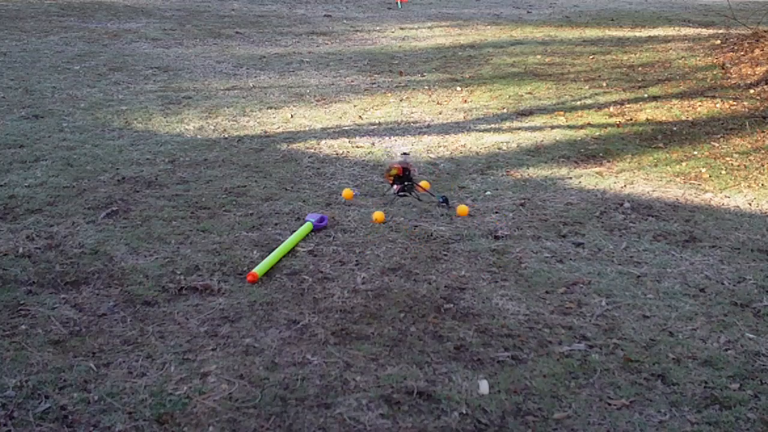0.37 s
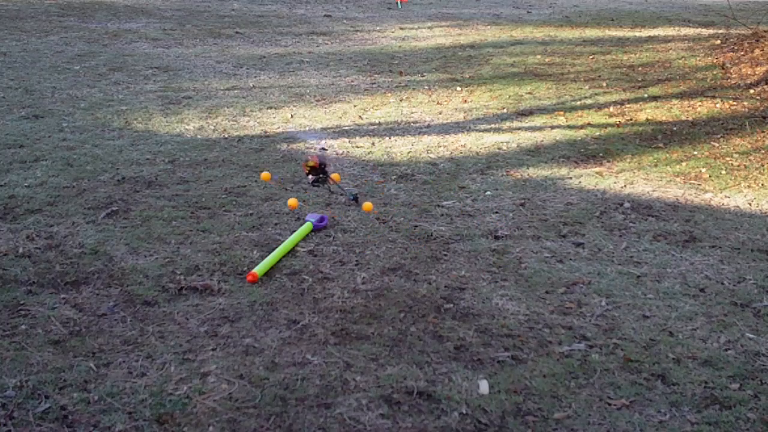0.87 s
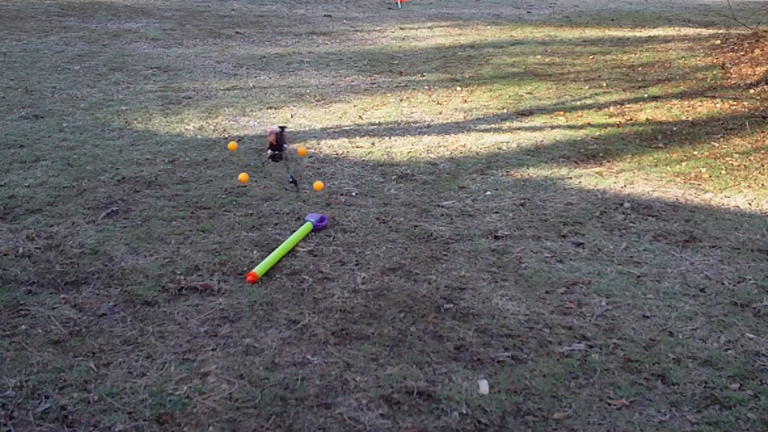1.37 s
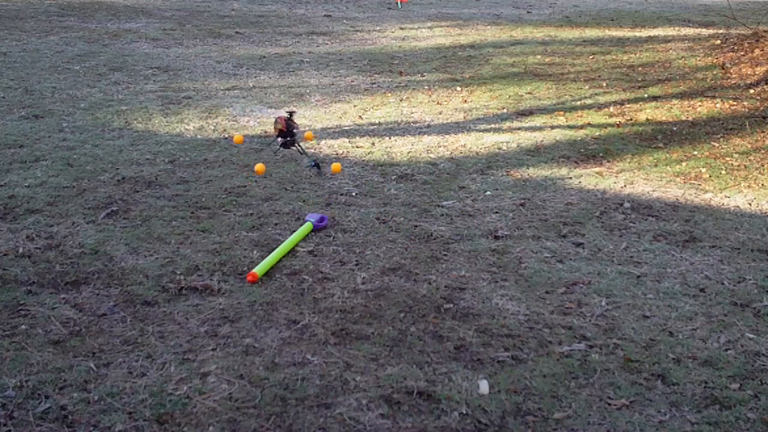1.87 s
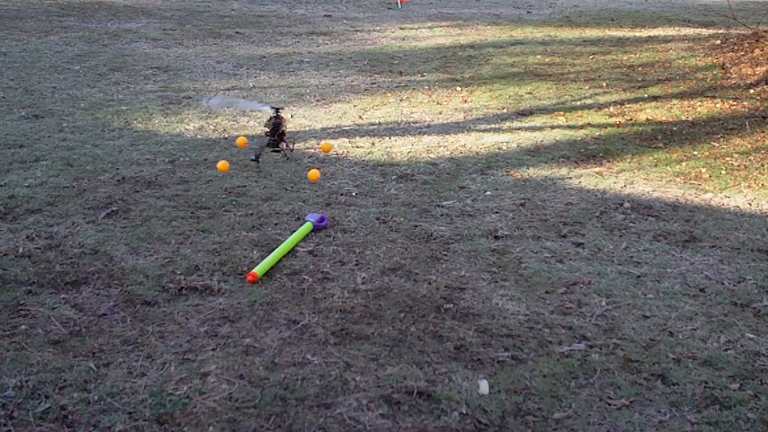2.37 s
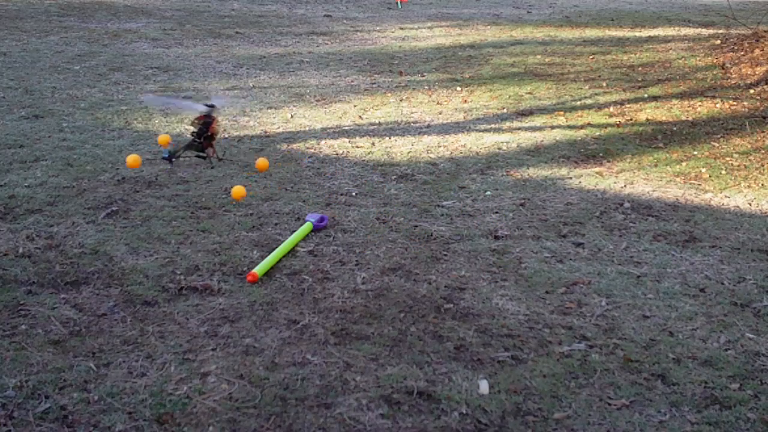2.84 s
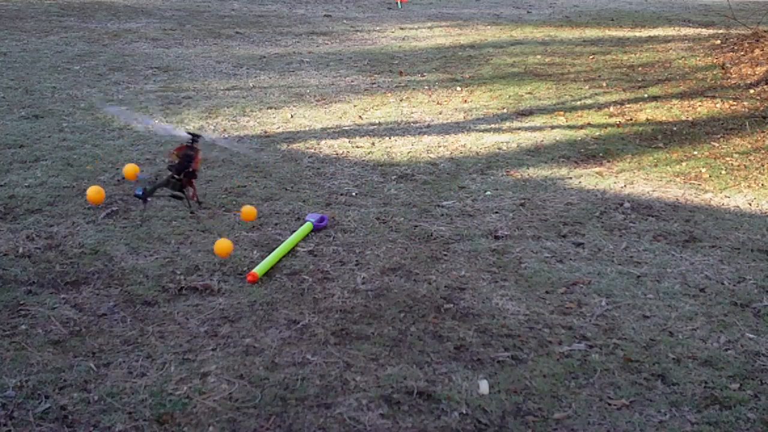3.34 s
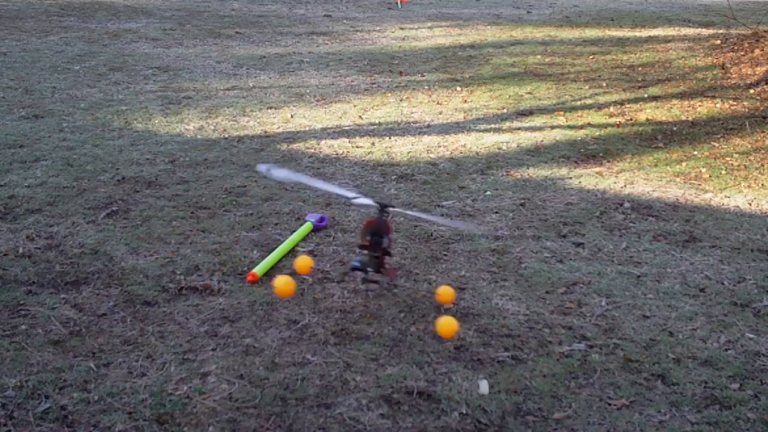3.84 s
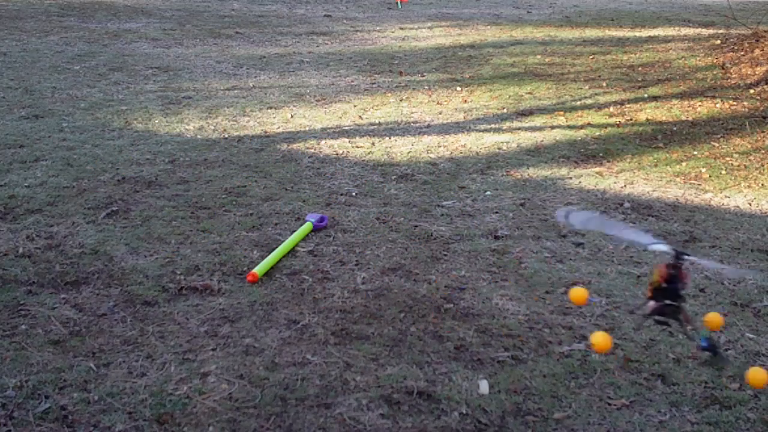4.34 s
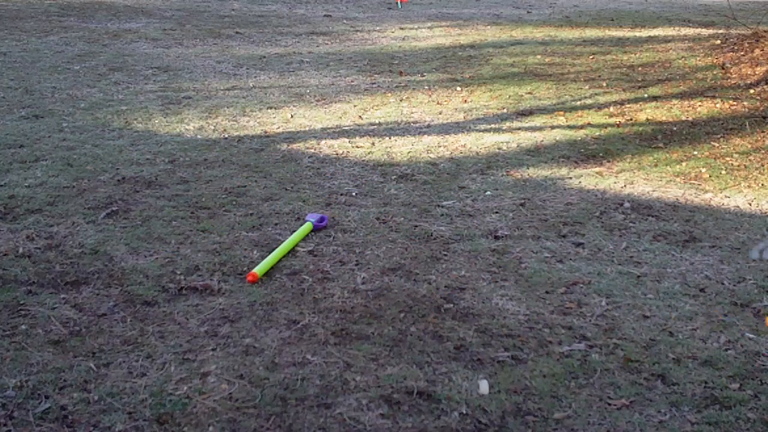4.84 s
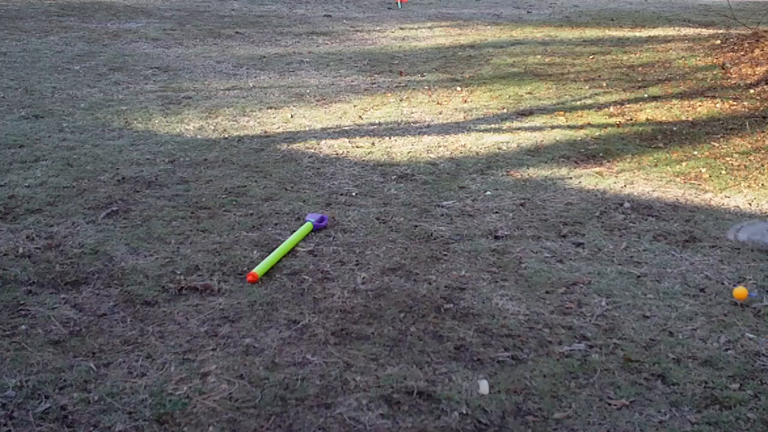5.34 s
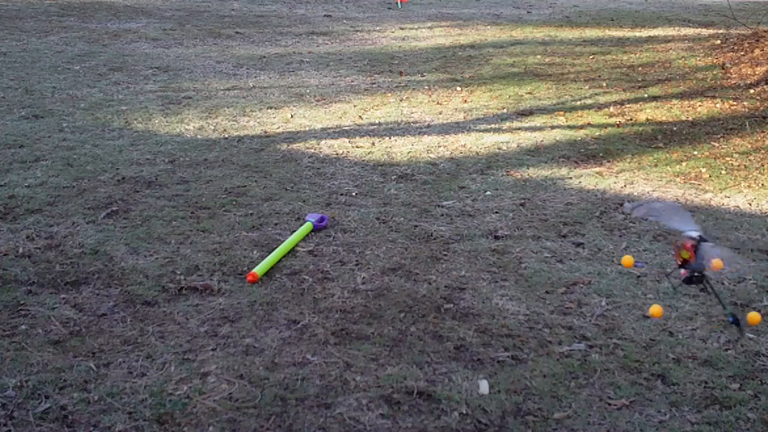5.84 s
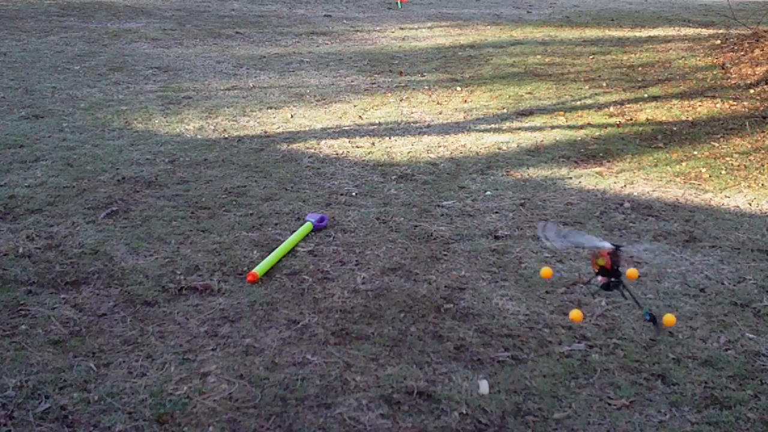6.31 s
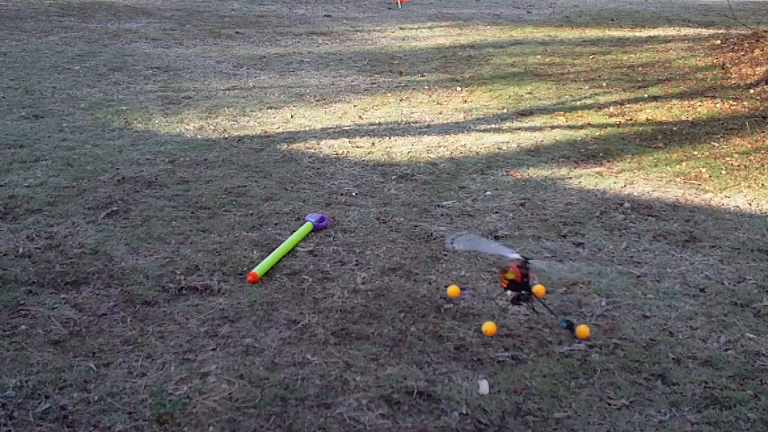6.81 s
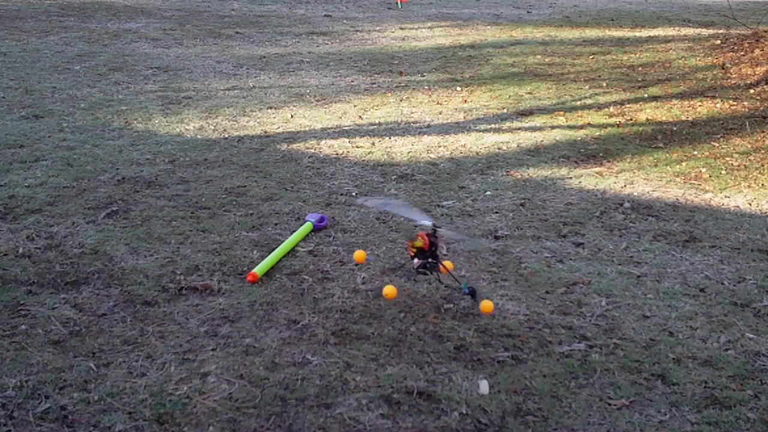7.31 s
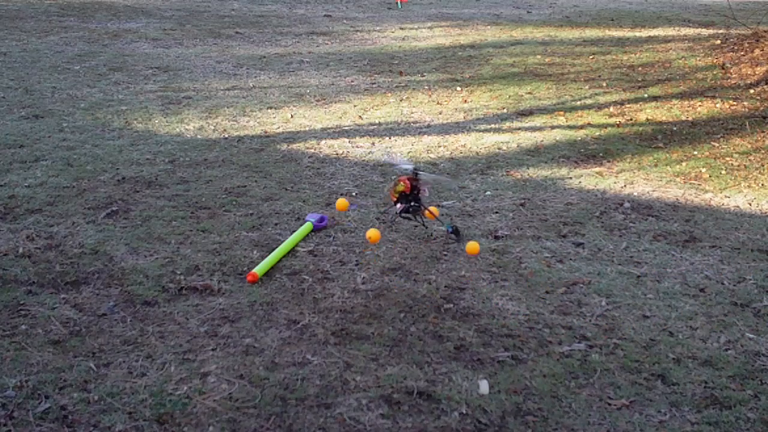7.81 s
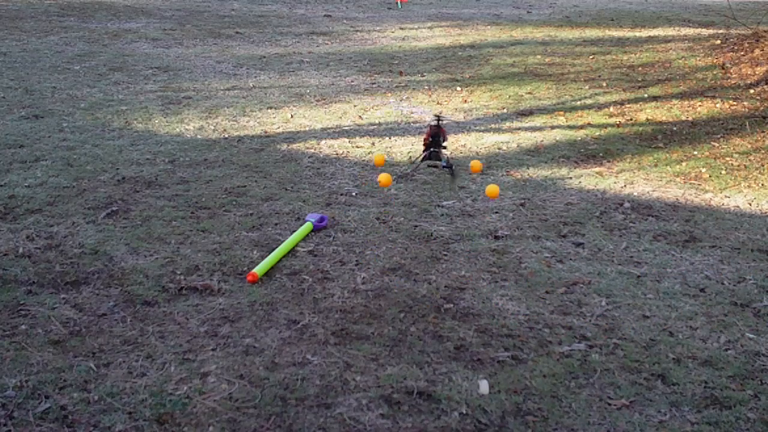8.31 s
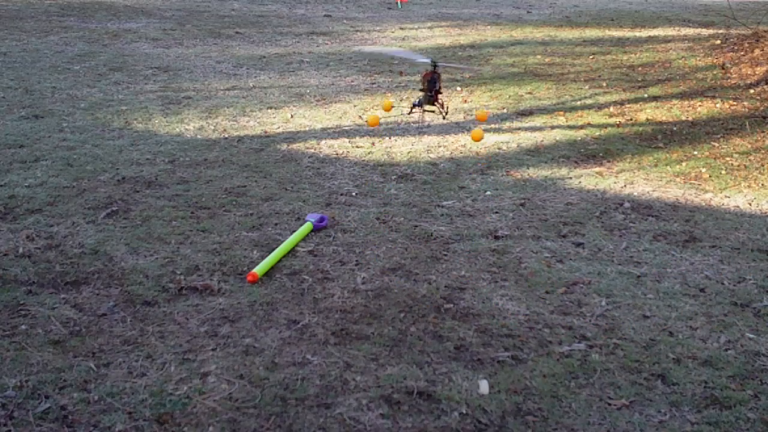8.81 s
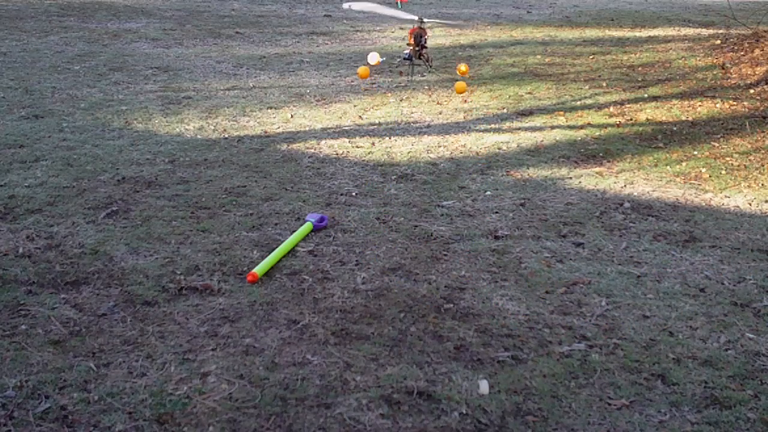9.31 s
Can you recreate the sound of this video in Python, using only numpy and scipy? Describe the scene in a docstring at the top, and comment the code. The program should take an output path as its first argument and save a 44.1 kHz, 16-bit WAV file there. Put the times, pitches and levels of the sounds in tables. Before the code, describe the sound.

A continuous electric motor whine, dense with buzzing overtones and gear rattle, comes from a little helicopter hovering low over a lawn. Airy rotor swish throbs about twenty-two times a second. Pitch climbs slightly in the first second, then wavers gently; brightness shifts as the craft turns. It swells midway, recedes a little and carries on without stopping. Distant road rumble lies beneath, uneven and thinning. Stationary open-air microphone, dry, no room echo.

```python
"""A whine on many multiples of a motor's speed: a small electric helicopter drifts to and fro low over a lawn.
The whine is a sum of sines with side tones, and the big gear repeats a pattern of knocks every rotor turn.
Filtered noise, throbbing with the rotor, gives the swish of the blades.
The grass returns a dull copy whose lag sweeps with the flight; far traffic, as filtered noise, rumbles below."""
import sys
import numpy as np
from scipy import signal
from scipy.fft import rfft, irfft, next_fast_len
from scipy.io import wavfile
from scipy.ndimage import uniform_filter1d, map_coordinates

SR = 44100
rng = np.random.default_rng(int(sys.argv[2]) if len(sys.argv) > 2 else 0)


def pcm_store(signal):
    """Save signal as 16-bit PCM."""
    levels = np.round(np.clip(np.atleast_2d(signal), -1, 1) * 32767)
    wavfile.write(sys.argv[1], SR, levels.astype(np.int16).T)


def convert_level_to_amplitude(level_db):
    """Map a level in decibels to its linear amplitude factor."""
    exponent = np.asarray(level_db, float) / 20
    return 10 ** exponent


N = 415422
STEP = 64   # samples between the values of a slow curve

# Motor speed, sagging and recovering with the load. Each row: time in seconds, speed in turns per second.
MOTOR_SPEED = [(0.0, 303.1), (0.52, 301.7), (0.62, 303.4), (0.76, 310.5), (0.88, 313.2), (1.0, 314.4),
               (1.12, 314.1), (1.3, 311.9), (1.75, 309.6), (1.97, 308.0), (2.38, 309.5), (2.62, 311.5),
               (3.0, 308.3), (3.45, 310.1), (3.72, 309.8), (4.25, 307.1), (4.5, 307.9), (4.72, 307.4),
               (5.05, 308.3), (5.25, 307.9), (5.75, 309.8), (6.0, 310.0), (6.35, 309.4), (6.55, 308.6),
               (6.64, 308.9), (6.78, 310.2), (7.25, 311.1), (7.85, 309.8), (8.17, 307.9), (8.55, 308.8),
               (8.9, 308.5), (9.15, 307.7), (9.42, 307.9)]
GEAR_RATIO = 14   # motor turns per rotor turn

# Strong whine lines. Each row: motor multiple, level in dB at the mean airframe level,
# share of the airframe level swing (dB per dB), share of the facing swing (dB per dB).
STRONG_LEVELS = [(3, -57.5, 0.16, 0.041), (5, -53, 0.21, -0.1), (10, -53, 0.49, -.1), (15, -56, 0.56, -.3),
                 (20, -55, 0.82, 0.45), (30, -48, 0.79, 0.43), (35, -62.5, 0.3, 0.34)]
# Side tones of the same lines, in the same order. Each row: motor multiple, first side tones in dB
# against the line, fall in dB per further side tone, looseness 0-1 (0: in step, one tick a rotor turn).
STRONG_SIDES = [(3, -13, 2.0, 1), (5, -13, 3.5, .7), (10, -7, 3.5, 1), (15, -5, 6.0, 1), (20, -7, 4.5, .6),
                (30, -2, 2.6, 1), (35, -1, 1.4, .15)]
# Weak whine lines. Each row: motor multiple, level in dB against the airframe level,
# first side tones in dB against the line, fall in dB per further side tone.
WEAK_LINES = [(2, -29, -19, 0.5), (6, -23.5, -13, 5), (8, -23, -23, 5), (11, -13.5, 5, 0),
              (12, -14.5, 0, 5), (13, -20, -5, -13), (14, -35, 6, -8), (16, -20.5, -5, 8),
              (17, -31, -3, -3), (31, -8, -4, -2.5), (32, -37, -5, 1.5)]
# Spread of the highest lines into side tones. Each row: time in seconds, divisor of the fall.
SCATTER = [(0, 4.1), (1.2, 3.1), (1.6, 1.1), (4.3, 1.1), (4.7, 4.1), (8.0, 4.1), (8.4, .8), (9.42, .8)]
# One whine line swells or sinks for a while.
# Each row: centre in seconds, motor multiple, length in seconds, change in dB.
SWELLS = [(0.44, 3, 0.42, -20), (0.1, 5, .4, -5), (0.59, 5, 0.34, -11), (0.2, 35, 0.73, 13.5),
          (1.13, 3, 0.62, 3), (0.51, 15, 0.97, -8), (0.5, 20, 0.85, -3), (0.39, 10, 0.49, -5),
          (1.05, 15, 0.35, 2.5), (1.15, 12, 0.6, -6), (1.6, 30, 0.27, 2.5), (2.05, 5, 0.28, -2),
          (3, 6, 1.6, 6), (3.8, 12, .5, -3), (3.6, 5, .15, -3), (1.2, 20, .6, -5), (1.85, 3, 0.27, -5),
          (1.74, 15, 0.25, 4), (1.95, 10, 0.43, -7), (2.7, 20, 0.74, 0), (2.28, 3, .5, 1.5),
          (2.4, 5, .15, -3), (3.2, 30, 1.6, 1), (2.95, 5, 0.23, 2), (3.5, 5, 0.22, -2.5),
          (2.85, 15, .9, -10), (3, 20, 0.43, 2), (3.8, 5, .25, 3.5), (4.0, 35, .5, 12), (4.4, 10, 0.5, 4),
          (5.1, 35, .4, -6), (4.9, 20, 0.76, 7), (4.85, 3, 0.16, 2), (4.5, 20, 0.28, 3),
          (4.5, 15, .15, 2.5), (4.2, 5, 0.16, -8), (4.95, 6, 0.57, -7), (5.1, 10, 0.23, 2),
          (5.202, 5, 0.34, -2.5), (5.4, 12, .5, 0), (5.7, 15, 1.8, 2.5), (5.95, 6, .3, -7),
          (6.5, 15, .2, -3), (7.8, 12, 0.26, 8), (7.0, 15, .3, -5), (5.7, 5, .3, 5), (6.7, 3, 0.43, 4),
          (6.7, 10, 0.63, -3), (7.197, 10, .4, 1.5), (7.687, 5, 0.34, 3.5), (7.7, 3, .5, 3.5),
          (8.8, 3, 0.62, 6), (8.2, 35, 2.4, 7), (8.3, 5, 0.78, -2), (8.4, 6, .5, 4.5), (9, 10, 0.36, -1),
          (8.8, 3, 0.26, 3.5), (8.8, 15, .3, -4), (8.5, 12, .3, 2), (9.2, 20, .5, -1), (9.3, 5, 0.53, -6.5)]
MEAN_AIRFRAME_DB = -44
WAVER_DB, WAVER_HZ = 1.25, 4.6   # spread and rate of the strong lines' unsteadiness

# Drive of the gear and blade noise. Each row: time in seconds, airframe level in dB,
# facing in dB (up when the open gear side points this way).
AIRFRAME = [(0.0, -44.5, -14), (0.2, -44.5, -16), (0.6, -47, -4), (0.95, -46.5, -4), (1.42, -48, 0.5),
            (1.91, -45.5, -7), (2.13, -47, 3), (2.5, -46, 6), (3.01, -44, 5), (3.38, -41.5, 5.5),
            (3.65, -40, 0.1), (3.95, -41, 4), (4.12, -40, 2.5), (4.35, -40.5, -1.5), (4.51, -40.5, -8),
            (4.75, -41.5, -4), (5.1, -42, -5.5), (5.6, -42.5, -5), (5.75, -44.5, 2), (6.4, -44.5, -1),
            (6.87, -45, 1.5), (7.03, -43, -2), (8.1, -44, -2.5), (8.37, -46, 0.5), (8.66, -44.5, 3),
            (9.18, -46, 9.5), (9.42, -46.5, 9)]
# Spectrum of the tooth knocks. Each row: frequency in Hz, relative density in dB.
TEETH_COLOUR = [(500, -33), (900, 2), (1050, -10), (1170, 5), (1350, -33), (2200, -2.5), (3100, -2.5),
                (4000, 5.5), (4500, -1), (6000, -6.5), (7500, -2), (9400, 3.5), (11000, -33), (13000, -54)]
# Spectrum of the blade noise. Each row: frequency in Hz, relative density in dB.
SWISH_COLOUR = [(300, -6.5), (700, -9.5), (1200, -9.5), (2000, -10), (3000, -4), (4400, -9), (6300, -4.5),
                (7600, -9), (9400, -8.5), (11000, -5), (11900, -12), (12400, -7.5), (13000, -22.5),
                (13900, -21.5), (14900, -39)]
# Throb of the treble swish. Each row: times per rotor turn, height of the cosine in dB.
THROB = [(1, 2), (2, 1.24), (4, -2), (8, 1.5)]
TREBLE_DB, TREBLE_PER_FACING = -4.5, 0.13   # wash treble: level in dB at facing 0, dB per dB of facing

# Lag of the ground echo, longer when the helicopter is near or high.
# Each row: time in seconds, lag in milliseconds.
ECHO_LAG = [(0.0, 1.0), (0.36, 1.01), (0.7, 0.73), (1.0, 0.6), (1.3, 0.61), (1.6, 0.68), (2.2, 0.95),
            (2.55, 1.26), (3.1, 1.84), (3.35, 1.95), (3.6, 2.25), (3.85, 2.3), (4.15, 2.2), (4.5, 1.94),
            (5.05, 1.51), (5.6, 1.08), (5.88, 0.85), (6.15, 0.77), (6.4, 0.64), (6.9, 0.61), (7.2, 0.74),
            (7.66, 1.08), (8.17, 1.51), (8.5, 1.62), (9.1, 1.9), (9.42, 1.9)]
# How well the lawn mirrors the small gearbox. Each row: frequency in Hz, gain in dB.
GRASS_GAIN = [(900, -2.5), (1550, -5), (1900, -5), (3100, -22), (3700, -9), (4600, -8), (6200, -9.5),
              (9300, -15)]
GRASS_CUT_HZ = 2130   # the wide rotor disc is mirrored mainly below this

# Spectrum of the road rumble. Each row: frequency in Hz, relative density in dB.
RUMBLE_COLOUR = [(15, -33), (30, -2.5), (60, -4), (90, 2.5), (150, -2.5), (240, 0), (330, -6.5),
                 (470, -14.5), (700, -28), (1500, -30.5), (3000, -44)]
# Surges of the rumble. Each row: centre in seconds, length in seconds,
# change of the deep part in dB, change of the upper part in dB.
SURGES = [(0.05, 0.49, -2, 4.5), (0.312, 0.1, 3.5, -6), (0.86, .5, -1.5, 2), (1.3, 0.48, 4.5, 0.5),
          (1.0, 0.16, 1, 1), (1.7, 0.16, 10.5, 1.5), (1.963, 0.24, 1, 4.5), (2.368, 0.35, 9, 1.5),
          (2.67, 0.24, 7, -1), (3.034, 0.38, 0.5, 3), (3.6, 0.43, -1.5, 1), (4.144, 0.38, -4.5, 6.5),
          (4.309, 0.41, 7.5, -3.5), (4.895, 0.75, -0.5, 3), (5.194, 0.22, 6, 3.5), (6.008, .5, 4.5, 3.5),
          (6.45, 0.33, 1, 3), (7.0, .3, 2, -0.5), (7.55, 0.16, 6, 4), (9.0, 0.5, -1, 2.5)]
# The traffic draws away: level in dB at the start, loss in dB per second.
DEEP_DB, DEEP_LOSS = -48.5, 0.56
UPPER_DB, UPPER_LOSS = -45, 1.27
HISS_DB, HISS_LOSS = -57.5, 0.5   # tyre noise above the rumble

NOTCH_HZ, NOTCH_WIDTH_HZ = 7860, 260


def whine(motor, airframe_db, facing_db):
    """Periodic forces: sines on motor multiples, modulated into side tones; mesh jitter blurs the high ones."""
    jitter_turns = (0.56 * drift(60) + 1.6 * drift(23)) / 1000
    mesh = motor + jitter_turns
    scatter = in_time(SCATTER)[0][::STEP]
    strong = strong_db(airframe_db, facing_db)
    lines = [(multiple, db, *sides) for (multiple, *sides), db in zip(STRONG_SIDES, strong)]
    lines += [(multiple, airframe_db + db, *sides) for multiple, db, *sides in WEAK_LINES]
    out = np.zeros(N)
    for multiple, db, first_db, fall_db, *looseness in lines:
        widened, tail_db = (scatter, 3.5) if multiple > 29 else (1, 0)
        rotor = motor[::STEP] / GEAR_RATIO
        sides = side_tones(rotor, first_db, fall_db / widened, tail_db, *looseness)
        line_db = db[::STEP] + swells_db(multiple)[:len(sides)]
        envelope = filled(sides * convert_level_to_amplitude(line_db) * np.sqrt(2))
        angle = (2 * np.pi * (round(multiple) * mesh % 1)).astype(np.float32)
        out += envelope.real * np.cos(angle) - envelope.imag * np.sin(angle)
    return out


def strong_db(airframe_db, facing_db):
    """Directivity and distance: each strong line follows both swings by its own shares, and wavers."""
    wavers = drifts(WAVER_HZ, count=len(STRONG_LEVELS))
    swing_db = airframe_db - MEAN_AIRFRAME_DB
    return [db + near * swing_db + faced * facing_db + filled(WAVER_DB * waver)
            for (_, db, near, faced), waver in zip(STRONG_LEVELS, wavers)]


def swells_db(multiple):
    """Superposed level changes: the bumps, in dB, of one whine line."""
    bumps = (db * bump(s, length) for s, k, length, db in SWELLS if round(k) == round(multiple))
    return sum(bumps, 0 * bump(0, 1))


def side_tones(rotor, first_db, fall_db, tail_db, looseness=1):
    """Modulation: run-out repeats each turn, giving side tones a rotor multiple apart that shift as the body turns."""
    away = np.r_[-11:0, 1:12][:, None]
    sway = drifts(4.0, count=2 * len(away))[:, :len(rotor)]
    tail_drive_db = tail_db * (away % 4 == 0)   # the tail gear turns four times per rotor turn
    strength = convert_level_to_amplitude(first_db - fall_db * (abs(away) - 1) + tail_drive_db + 3.0 * sway[::2])
    loose_turns = looseness * (rng.random(away.shape) - 0.5 + 0.2 * sway[1::2])
    turns = away * rotor + loose_turns
    envelope = 1 + np.sum(strength * np.exp(2j * np.pi * turns), axis=0)
    power = uniform_filter1d(abs(envelope) ** 2, size=180)   # mean over about a quarter second
    return envelope / np.sqrt(power)


def teeth(rotor, renew_s):
    """Periodic excitation: the knocks repeat each turn; the pattern heard changes slowly as the body turns."""
    steps = 2000   # pattern points per rotor turn
    patterns = rng.standard_normal((40, steps + 1))
    patterns[:, -1] = patterns[:, 0]   # closes the circle
    place = np.arange(N) / SR / max(renew_s, 0.3)
    blend = place % 1
    heard = map_coordinates(patterns, [place, rotor % 1 * steps], order=1)
    even = heard / np.sqrt(blend ** 2 + (1 - blend) ** 2)   # same power throughout the blend
    return coloured(even, TEETH_COLOUR)


def swish(rotor):
    """Turbulence noise of blades and tail rotor, amplitude-modulated by the rotor, most in the treble."""
    low, high = split(coloured(rng.standard_normal(N), SWISH_COLOUR), 8500)
    throb_db = per_turn(rotor, THROB)
    low_gain = convert_level_to_amplitude(0.4 * throb_db + 0.5 * drift(3.7))
    high_gain = convert_level_to_amplitude(throb_db + 0.5 * drift(13))
    return low * low_gain + high * high_gain


def per_turn(rotor, rows):
    """Fourier series: a pattern repeating every rotor turn, as a few cosines of chance phase."""
    return sum(size * np.cos(2 * np.pi * (round(times) * rotor + rng.random())) for times, size in rows)


def patchy(x, depth_db, rate_hz):
    """Uneven radiation of the turning body: overlapping bands swell and sink on their own."""
    size, count = next_fast_len(N), 8
    octaves = np.log2(np.fft.rfftfreq(size, 1 / SR) / 500 + 1e-9)
    place = np.clip(octaves * 1.6, 0, count - 1)   # 1.6 bands per octave from 500 Hz
    spectrum = rfft(x, size)
    out = np.zeros(N)
    for k, sway in enumerate(drifts(rate_hz, count=count)):
        band = irfft(spectrum * np.clip(1 - abs(place - k), 0, 1), size)[:N]
        out += band * filled(convert_level_to_amplitude(depth_db * sway))
    return out


def grass_echo(tones, wash, lag_ms):
    """Interference: a late, duller copy off the lawn combs the spectrum of the direct sound."""
    mirrored_tones = coloured(tones, GRASS_GAIN, even=False)
    mirrored_wash = convert_level_to_amplitude(-8.5) * split(wash, GRASS_CUT_HZ)[0]
    delayed_place = np.arange(N) - lag_ms * SR / 1000
    return np.interp(delayed_place, np.arange(N), mirrored_tones + mirrored_wash)


def traffic():
    """Broadband road noise in three bands, each fading at its own pace; surges make the lower two lumpy."""
    s = np.arange(N) / SR
    deep_surge_db = filled(sum(db * bump(at, length) for at, length, db, _ in SURGES))
    upper_surge_db = filled(sum(db * bump(at, length) for at, length, _, db in SURGES))
    deep_db = DEEP_DB - DEEP_LOSS * s + deep_surge_db + 0.75 * drift(5.4)
    upper_db = UPPER_DB - UPPER_LOSS * s + upper_surge_db + 1.36 * drift(5.7)
    hiss_db = HISS_DB - HISS_LOSS * s + 1.1 * drift(2.3)
    deep, rest = split(coloured(rng.standard_normal(N), RUMBLE_COLOUR), 112)
    upper, hiss = split(rest, 366)
    return convert_level_to_amplitude(deep_db) * rms_one(deep) + convert_level_to_amplitude(upper_db) * rms_one(upper) + convert_level_to_amplitude(hiss_db) * rms_one(hiss)


def rms_one(x):
    """Normalisation: scale to unit rms."""
    return x / np.sqrt(np.mean(x ** 2) + 1e-20)


def in_time(rows):
    """Linear interpolation: the columns of a curve table at every sample."""
    s, *columns = np.transpose(rows)
    return [np.interp(np.arange(N) / SR, s, c) for c in columns]


def coloured(x, points, even=True):
    """Linear filtering: shape a signal by a spectrum given in dB; rms 1 if even."""
    size = next_fast_len(N)
    hz, db = np.transpose(points)
    log_hz = np.log(np.fft.rfftfreq(size, 1 / SR) + 1)
    gain = convert_level_to_amplitude(np.interp(log_hz, np.log(hz), db))
    shaped = irfft(rfft(x, size) * gain, size)[:N]
    return rms_one(shaped) if even else shaped


def split(x, hz):
    """Complementary filters: the parts below and above a crossover, which sum to the whole."""
    low = signal.sosfiltfilt(signal.butter(2, hz, fs=SR, output="sos"), x)
    return low, x - low


def drifts(rate_hz, count):
    """Low-passed noise: rows of slow chance, spread 1, one value every STEP samples."""
    r = np.exp(-2 * np.pi * STEP * rate_hz / SR)
    noise = rng.standard_normal((count, N // STEP + 1002))
    slow = signal.lfilter([1], [1, -2 * r, r * r], noise)[:, 1000:]   # skips the filter's start
    return slow / slow.std(axis=1, keepdims=True)


def drift(rate_hz):
    """Low-passed noise: one slow chance at every sample."""
    return filled(drifts(rate_hz, count=1)[0])


def filled(coarse):
    """Linear interpolation: values given every STEP samples, joined to every sample."""
    return np.interp(np.arange(N) / STEP, np.arange(len(coarse)), coarse)


def bump(at_s, length_s):
    """Gaussian curve: a smooth rise and fall of height 1, one value every STEP samples."""
    s = np.arange(N // STEP + 2) * STEP / SR
    return np.exp(-4 * ((s - at_s) / max(length_s, 0.03)) ** 2)


def scene():
    """Superposition: the helicopter's direct sound, its ground echo and the traffic."""
    (speed_hz,), (lag_ms,) = in_time(MOTOR_SPEED), in_time(ECHO_LAG)
    level_db, facing_db = in_time(AIRFRAME)
    motor = np.cumsum(speed_hz + 0.2 * drift(3.0)) / SR   # turns so far; the speed hunts a little
    rotor = motor / GEAR_RATIO
    tones = whine(motor, level_db, facing_db)
    knocks = convert_level_to_amplitude(-5.0) * teeth(rotor, renew_s=0.6)
    low, high = split(convert_level_to_amplitude(-1.5) * swish(rotor) + knocks, 8000)
    treble = convert_level_to_amplitude(TREBLE_DB + TREBLE_PER_FACING * facing_db) * rms_one(high)
    wash = convert_level_to_amplitude(level_db) * patchy(low + treble, depth_db=1.05, rate_hz=2.95)
    echo = grass_echo(tones, wash, lag_ms)
    return (tones + wash + echo + traffic())[None]


def roll_off(x):
    """The treble ends steeply here."""
    return signal.sosfilt(signal.butter(12, 14920, fs=SR, output="sos"), x)


def record(dry):
    """Band-stop filtering: a deep narrow notch in the treble."""
    edges_hz = [NOTCH_HZ - NOTCH_WIDTH_HZ / 2, NOTCH_HZ + NOTCH_WIDTH_HZ / 2]
    notch = signal.butter(2, edges_hz, "bandstop", fs=SR, output="sos")
    notched = signal.sosfilt(notch, dry)
    return roll_off(notched)


dry = scene()
out = record(dry)
pcm_store(out)
```